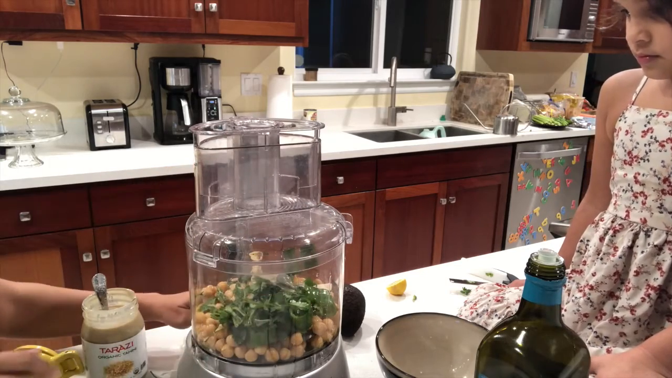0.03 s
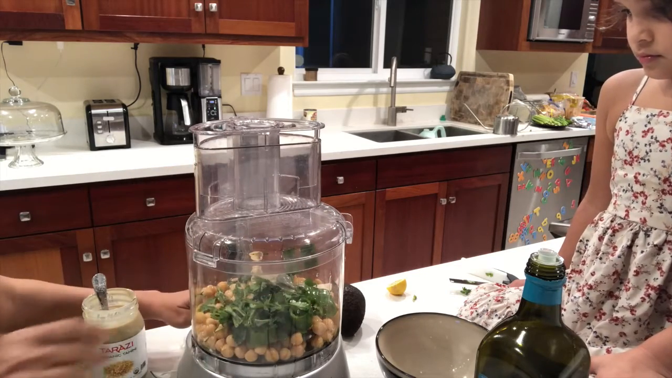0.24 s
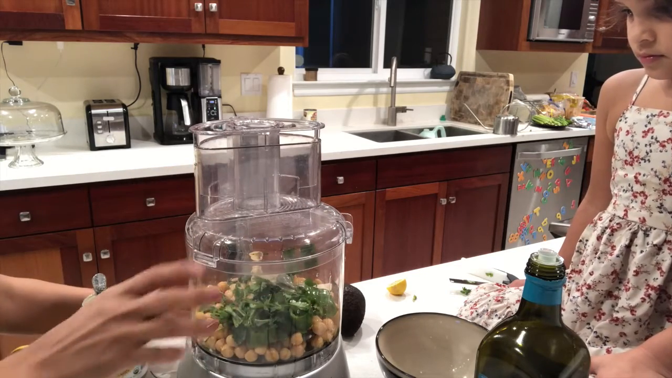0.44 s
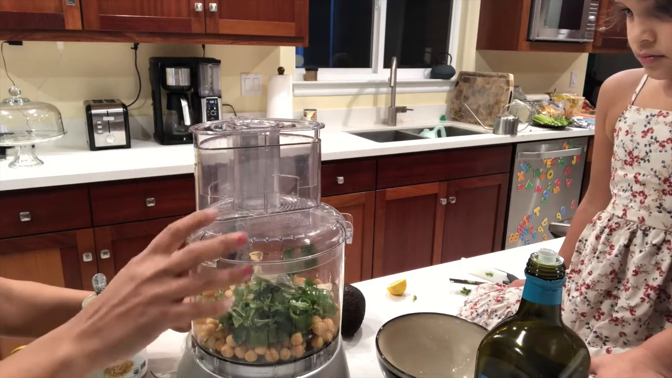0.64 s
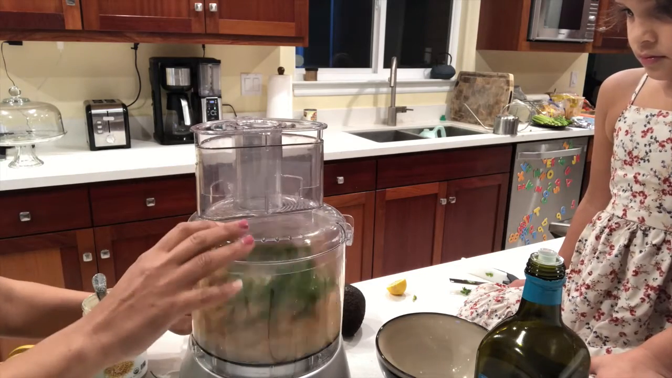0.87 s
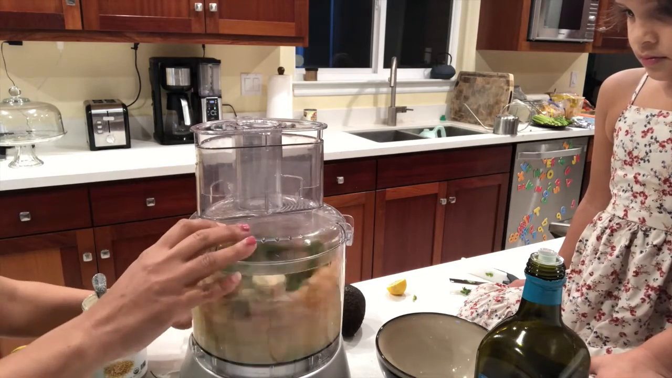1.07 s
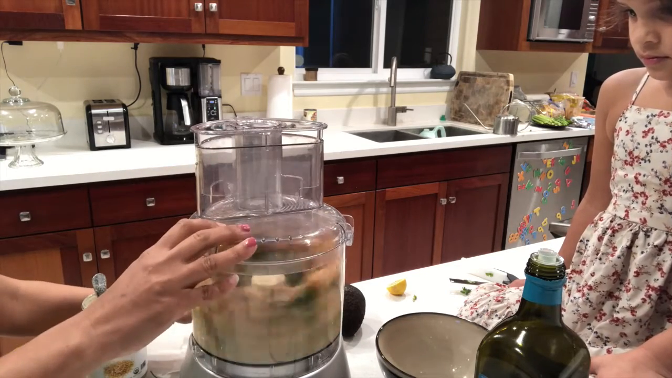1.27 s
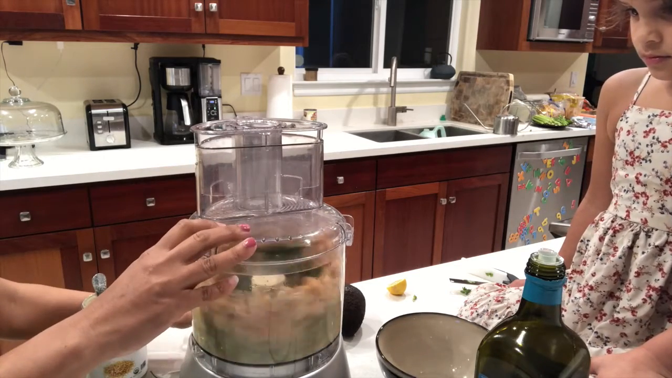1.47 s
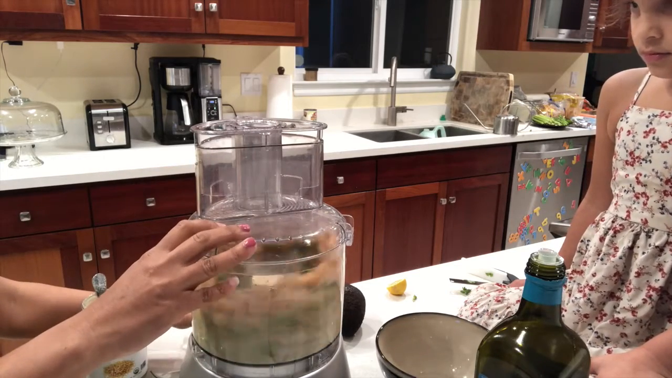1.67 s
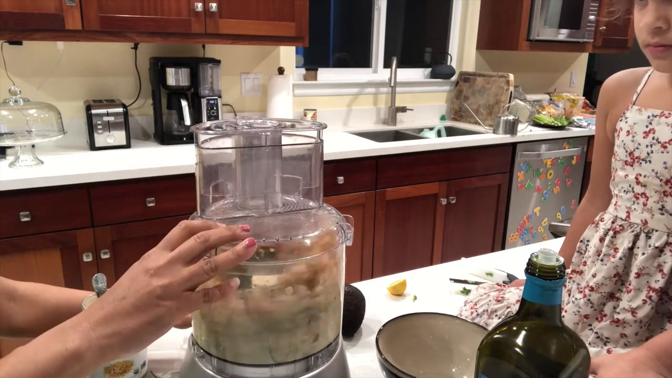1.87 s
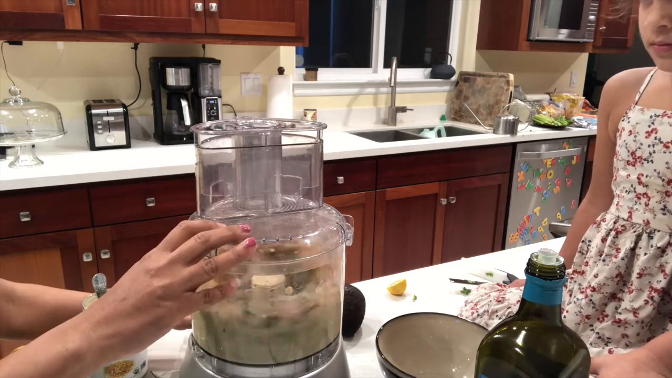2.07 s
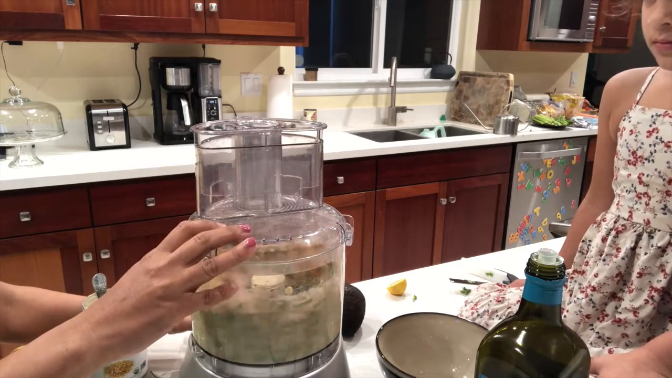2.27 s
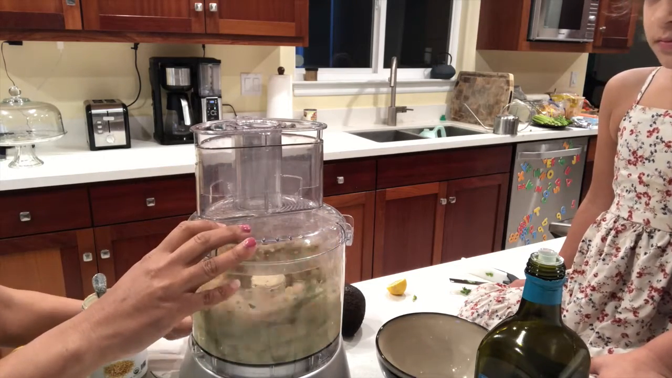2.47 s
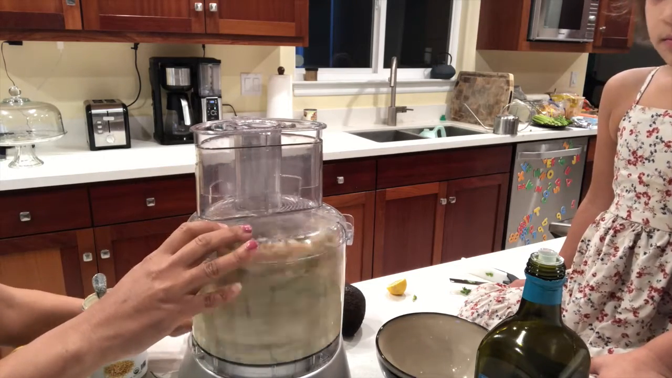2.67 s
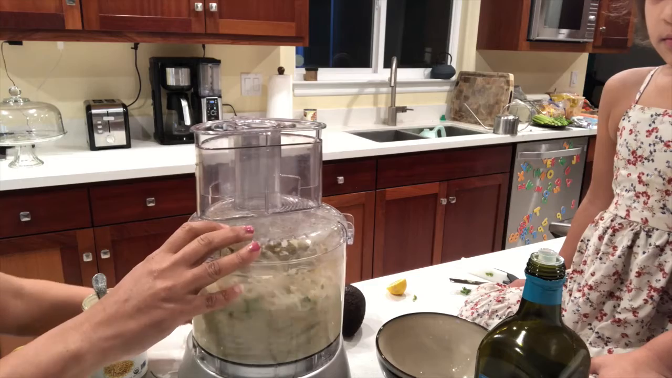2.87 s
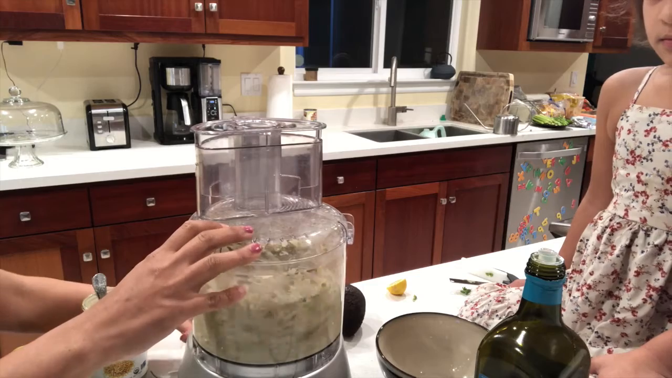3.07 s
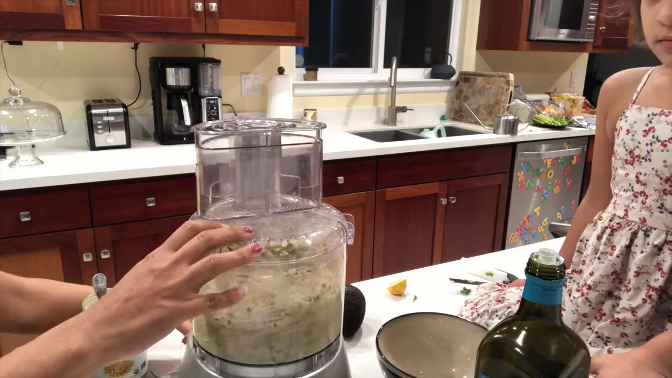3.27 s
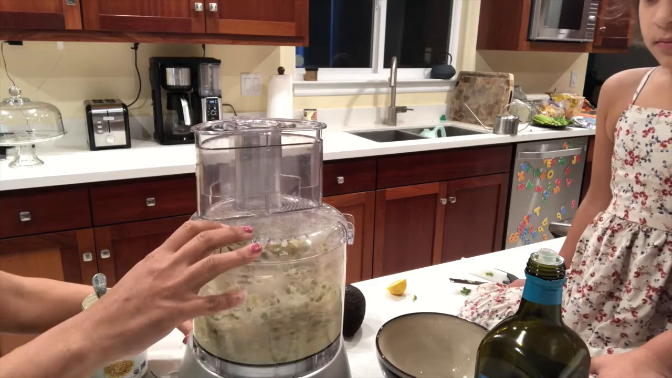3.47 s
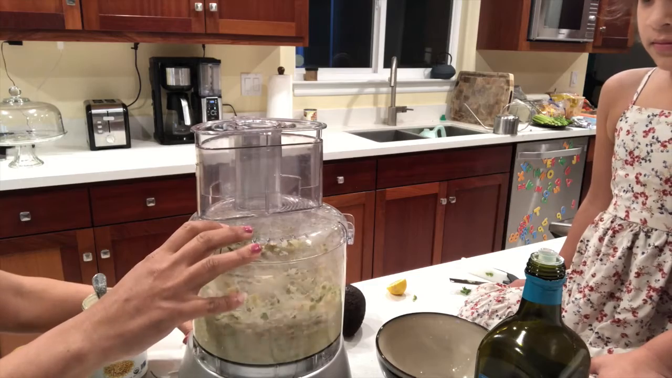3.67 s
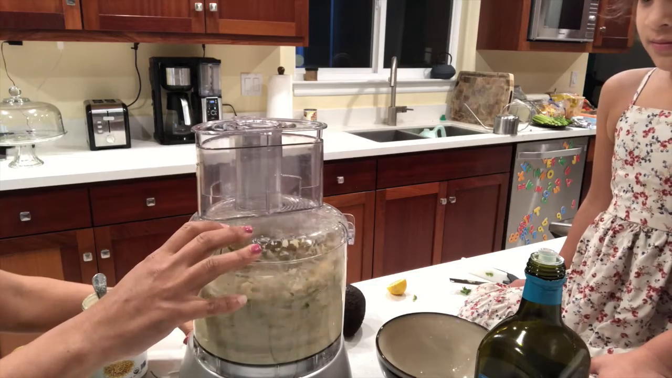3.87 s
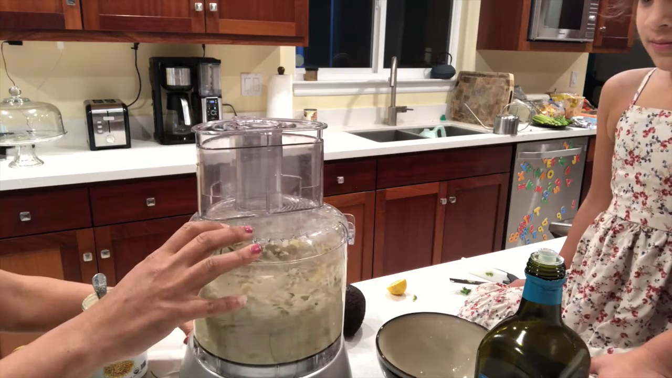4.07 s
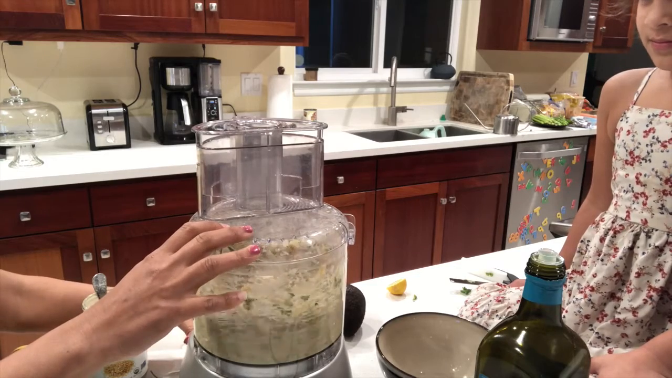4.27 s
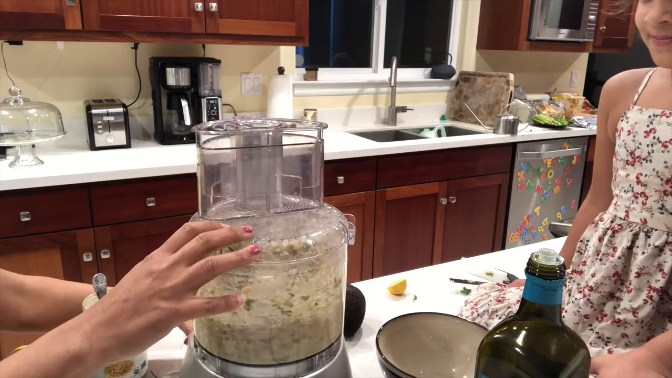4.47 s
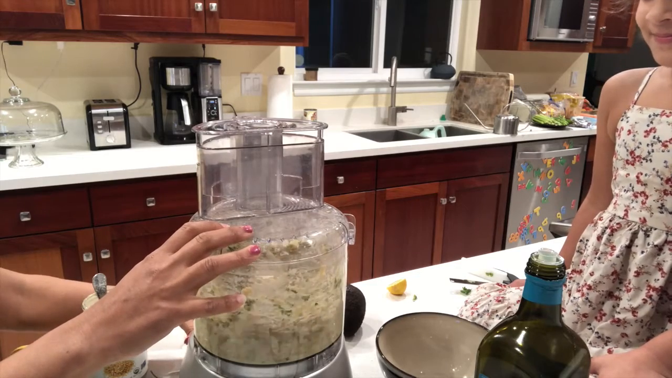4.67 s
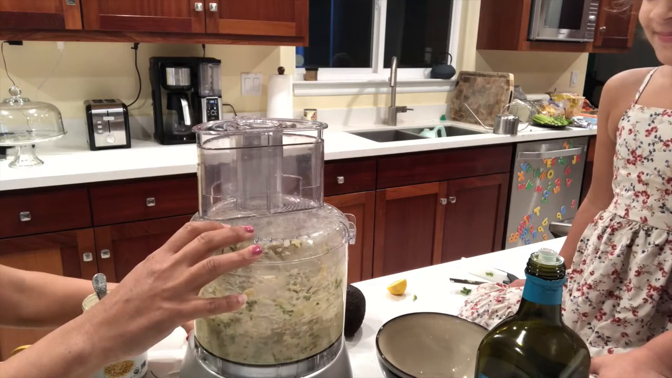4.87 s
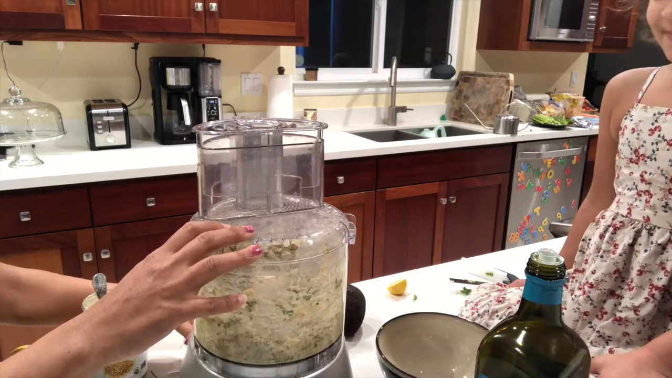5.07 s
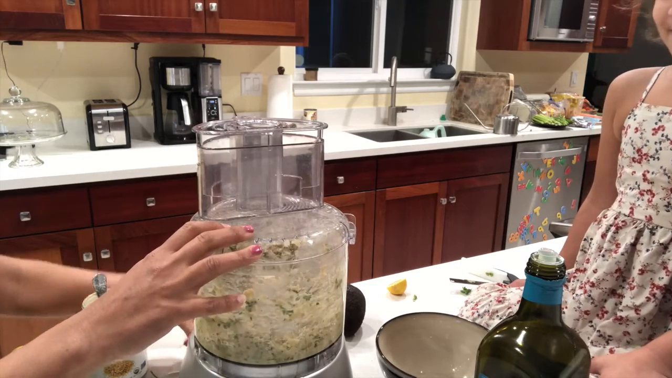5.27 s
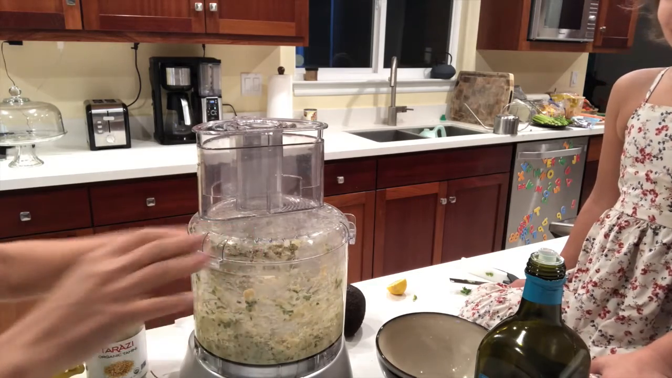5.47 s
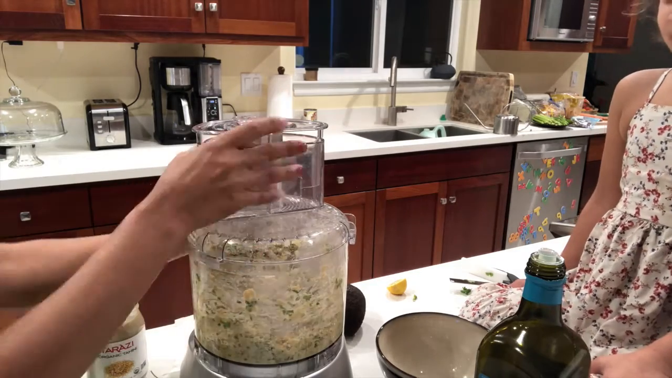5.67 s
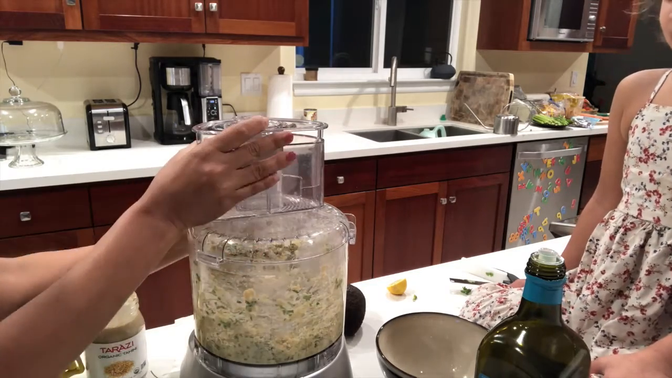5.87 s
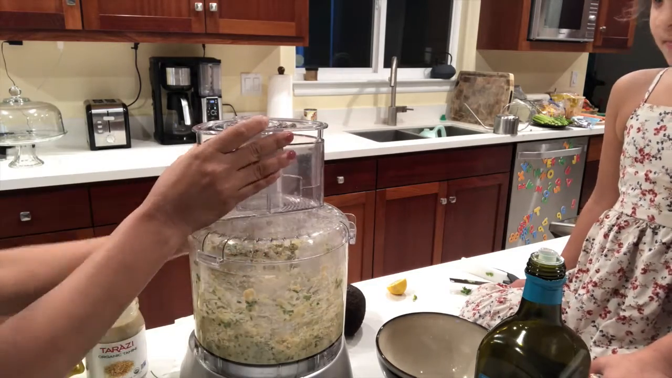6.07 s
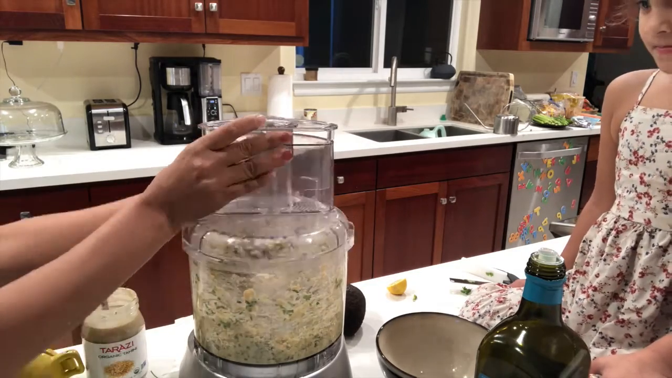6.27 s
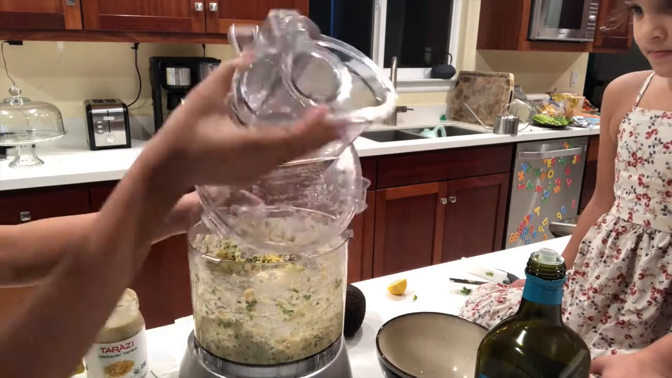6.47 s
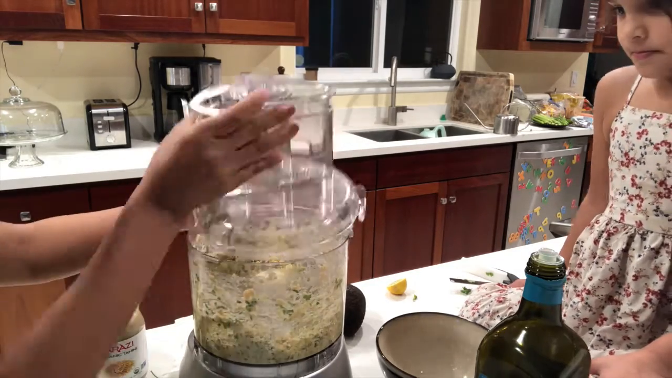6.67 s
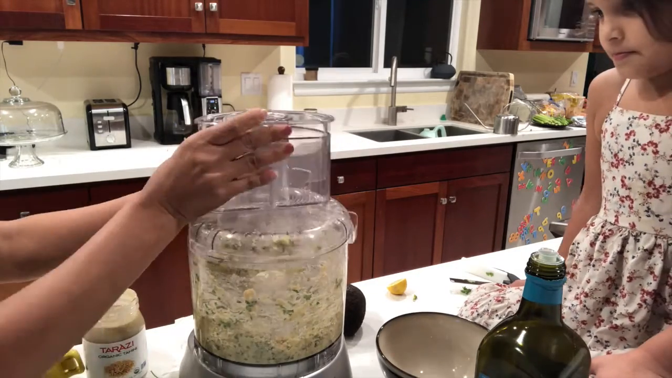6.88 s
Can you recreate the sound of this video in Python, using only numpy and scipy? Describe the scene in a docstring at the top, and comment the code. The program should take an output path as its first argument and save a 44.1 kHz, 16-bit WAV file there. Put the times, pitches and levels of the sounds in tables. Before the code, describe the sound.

For the first 0.7 seconds there is only low, faint kitchen hum with barely audible ticks. A dull thump and click at 0.73-0.8 start a food processor, close and loud. Its motor whirs low with wavering tones over a rumbling base while the plastic bowl rattles. From 1.0 to 1.8 hard chickpeas knock and crack against the wall, strongest near 1.4, 1.55 and 1.8. The mix then churns more evenly, with rough grinding surges and jolts around 2.55-3.0 and 3.7-4.0, and fewer knocks. At 4.9 the power cuts; the noise collapses quickly, leaving faint treble flickers and small ticks near 5.4. The hum ends around 5.6. From 5.75 hands rub and tap the hollow plastic lid in light clicks, with a sharp knock at 6.29 and a cluster of bumps at 6.77-6.85, faintly echoing in the room.

```python
"""Food processor and its lid

A motor spins a two-armed blade through chickpeas and herbs: wavering tones, a rumbling base, a rattling bowl.
Pieces drag on the plastic bowl as swells of rough noise, or knock on it as short rings with dry cracks.
The motor coasts down; hands then click, rub and bump the lid, made of small blows and soft noise.
The blows echo faintly in the kitchen. A low room hum lies underneath and stops before the end."""
import sys
import numpy as np
from scipy import signal
from scipy.fft import rfft, irfft, next_fast_len
from scipy.io import wavfile
from scipy.ndimage import map_coordinates

SR = 44100
rng = np.random.default_rng(int(sys.argv[2]) if len(sys.argv) > 2 else 0)


def log_audio(samples):
    """Write samples as a 16-bit WAV file to the path given in sys.argv[1]."""
    # one column per channel
    frames = np.atleast_2d(samples).T
    # limit to full scale, then quantise
    limited = np.clip(frames, -1, 1)
    pcm = np.round(limited * 32767).astype(np.int16)
    wavfile.write(sys.argv[1], SR, pcm)


def volts_from_db(level):
    """Convert decibel levels to linear amplitude ratios."""
    exponent = np.asarray(level, float) / 20
    return 10 ** exponent


N = 305172
T = np.arange(N) / SR
ON_S, OFF_S = 0.804, 4.908  # the switch


def unit(x):
    """Scales a sound to rms 1."""
    return x / np.sqrt(np.mean(x ** 2) + 1e-20)


def along(points, hz):
    """Reads a curve of (Hz, value) points on a log frequency axis."""
    f, v = np.transpose(points)
    return np.interp(np.log(hz + 1), np.log(f + 1), v)


def gains(rows):
    """One gain per sample for each dB column; -140 dB outside the rows."""
    s, *columns = np.transpose(rows)
    return [volts_from_db(np.interp(T, s, c, left=-140, right=-140)) for c in columns]


def wobble(rate):
    """A smooth random curve with this many knots a second."""
    knots = rng.standard_normal(int(N * rate / SR) + 4)
    return map_coordinates(knots, [T * rate])


def swell(s, half_s):
    """A soft bump in time, down to 1/e at half_s from its middle."""
    return np.exp(-((T - s) / half_s) ** 2)


def white():
    """Fresh white noise."""
    return rng.standard_normal(N)


def filtered(x, response):
    """Multiplies the spectrum of x by a response of frequency."""
    m = next_fast_len(len(x) + 8192)  # room for the ringing
    return irfft(rfft(x, m) * response(np.fft.rfftfreq(m, 1 / SR)), m)[:len(x)]


def noise(spectrum, gate=1):
    """Gated noise of a given colour, rms 1."""
    return unit(filtered(gate * white(), lambda hz: volts_from_db(along(spectrum, hz))))


def modes(table):
    """Response of (Hz, width Hz, dB) resonances with alternating signs."""
    def response(f):
        total = 0
        for k, (centre, width, db) in enumerate(table):
            resonance = 1j * f * width / (centre * centre - f * f + 1j * f * width)
            total = total + (-1) ** k * volts_from_db(db) * resonance
        return total
    return response


def swishes(rows):
    """Each row is a soft swell of noise in its own frequency band."""
    total = 0
    for s, length, hz, width, db in rows:
        band = filtered(white(), lambda f: modes([(hz, width, 0)])(f) ** 2)
        total = total + volts_from_db(db) * swell(s, length / 2) * unit(band)
    return total


# speed of the motor shaft: (time [s], speed [turns/s])
SHAFT_SPEED = [(.79, 24), (.9, 30.2), (1.1, 29.8), (4.88, 29.1), (5.05, 20), (5.3, 6)]


def shaft_angle():
    """Adds up the shaft's speed to the angle it has turned, in radians."""
    return 2 * np.pi * np.cumsum(np.interp(T, *np.transpose(SHAFT_SPEED))) / SR


def blade_gate(depth_db, lumps_db, lump_rate):
    """Each of two blade arms pushes the food once a turn; the load is lumpy."""
    turn = shaft_angle()
    beat = np.cos(2 * turn + .5 * wobble(4.7)) + .4 * np.cos(turn)
    push = 0.5 + 0.17 * wobble(13)
    return volts_from_db(depth_db * beat * push + lumps_db * wobble(lump_rate))


def powered(late_s, rise_s, drop_db, fade_db_per_s):
    """Gain of a layer that wakes after the switch, drops at the stop and dies away."""
    rise = np.clip((T - ON_S - late_s) / rise_s, 0, 1) ** 2
    after = np.maximum(T - OFF_S, 0)
    return rise * volts_from_db(-drop_db * (1 - np.exp(-after / 0.0143)) - fade_db_per_s * after)


# layers of the running machine, before the switch shapes them:
# (time [s], base rumble [dB], bowl rattle [dB], slosh [dB], stem chatter [dB], hum [dB])
RUNNING_LEVELS = [(.8, -32, -26, -42.5, -26, -28), (1.1, -30.5, -29.5, -43, -40.5, -33),
                  (1.35, -31.5, -30.5, -44.5, -35, -42.5), (1.5, -34, -34, -46, -36.5, -40.5),
                  (1.848, -36, -32.5, -48, -42.5, -40), (2.15, -33.5, -29.5, -45, -40, -37.5),
                  (2.5, -30.5, -29.5, -44.5, -38.5, -35), (2.68, -31, -29, -42, -45, -38.5),
                  (2.75, -30.5, -27.5, -40, -39, -47), (2.88, -28.5, -28.5, -44.5, -34, -47),
                  (3.1, -33, -32.5, -45, -39, -37.5), (3.6, -32.5, -31, -42, -36.5, -34),
                  (3.85, -31, -34, -42.5, -38, -37.5), (4.05, -33, -32, -45.5, -36.5, -38),
                  (4.4, -35, -33, -44.5, -38.5, -34.5), (4.85, -34, -31.5, -44, -37, -37),
                  (4.89, -34, -36, -53, -41.5, -37)]


def running():
    """One gain per sample for each layer of the running machine."""
    s, *columns = np.transpose(RUNNING_LEVELS)
    return [volts_from_db(np.interp(T, s, c)) for c in columns]


# motor tones: (multiple of the shaft speed [-], relative level [dB])
SHAFT_ORDERS = [(2, -27), (4, -16), (5, 2), (6, -2), (8, -12.5), (9, -38.5), (10, -20), (11, -6), (14, -15)]


def motor_hum():
    """Tones at multiples of the shaft's speed waver in pitch and level."""
    turn = shaft_angle()
    tones = 0
    for k, db in SHAFT_ORDERS:
        wave = np.sin(k * turn + 0.044 * k * wobble(6.7))
        tones = tones + volts_from_db(db + 0.92 * wobble(2.8)) * wave
    return running()[4] * powered(late_s=0.14, rise_s=0.19, drop_db=13, fade_db_per_s=200) * tones


# colour of the rumbling base: (frequency [Hz], relative level [dB])
BASE_COLOUR = [(53, -49.5), (90, -26.5), (133, -10), (150, -3.5), (200, 3), (259, -0.5), (304, 0),
               (383, -5), (430, -8.5), (542, -14), (650, -14), (840, -49), (1430, -120)]


def base_rumble():
    """The motor's base rumbles: low noise that swells and sinks unevenly."""
    level = running()[0] * powered(late_s=.002, rise_s=.03, drop_db=1.0, fade_db_per_s=112)
    level = level * (1 - .7 * swell(1.0, .015))  # the rumble dips briefly
    gate = blade_gate(depth_db=0.0, lumps_db=-0.05, lump_rate=27) * volts_from_db(.7 * wobble(7.5))
    return level * noise(BASE_COLOUR, gate)


# lumps that jolt the machine: (time [s], rumble level [dB], counter shake level [dB])
JOLT_EVENTS = [(0.822, -30.5, -66), (.87, -19.5, -59), (.915, -26.5, -65), (1.36, -42.5, -54),
               (1.621, -23.5, -59.5), (1.69, -28, -55), (2.15, -26.5, -65.5), (2.645, -24, -35),
               (2.801, -27.5, -54), (2.889, -28, -44.5), (3.01, -28, -52), (3.745, -22, -54),
               (3.81, -37, -66), (3.98, -25.5, -65), (4.74, -45, -54)]


def jolts():
    """Lumps in the food jolt the machine and its base booms in one low resonance."""
    boom = unit(filtered(white(), lambda f: modes([(213, 110, 0)])(f) ** 2))
    return sum(volts_from_db(db) * swell(s, half_s=.018) for s, db, _ in JOLT_EVENTS) * boom


# colour of the shaking counter: (frequency [Hz], relative level [dB])
SHAKE_COLOUR = [(20, -37.5), (40, -16), (60, 12), (80, 3.5), (110, -46)]


def counter_shake():
    """The machine shakes the counter: very low noise, stronger at each jolt."""
    level = volts_from_db(-60 + 3 * wobble(6.3)) * powered(late_s=.01, rise_s=.06, drop_db=3, fade_db_per_s=90)
    level = level + sum(volts_from_db(db) * swell(s, half_s=.04) for s, _, db in JOLT_EVENTS)
    return level * noise(SHAKE_COLOUR, volts_from_db(1.8 * wobble(13)))


# resonances of the blade stem: (frequency [Hz], width [Hz], relative level [dB])
STEM_MODES = [(2080, 160, 2), (2202, 180, 0)]


def stem_chatter():
    """The stem chatters in short bursts, mostly as a blade arm passes."""
    bursts = blade_gate(depth_db=9.0, lumps_db=4.5, lump_rate=62) * volts_from_db(.8 * wobble(10.0))
    sharpened = lambda f: modes(STEM_MODES)(f) * modes([(2120, 900, 0)])(f)
    level = running()[3] * powered(late_s=.03, rise_s=.22, drop_db=4.5, fade_db_per_s=90)
    return level * unit(filtered(bursts * white(), sharpened))


# resonances of the plastic bowl and lid: (frequency [Hz], width [Hz], relative level [dB])
BOWL_MODES = [(788, 44, -6.5), (1070, 54, 4.5), (1247, 47, 2), (1750, 600, -12.5), (2806, 50, -4),
              (3670, 110, -27), (4760, 240, -15.5), (5500, 430, -19), (6310, 200, -19.5), (7300, 190, -20)]


def pelted_bowl():
    """Bits of food pelt the bowl as gated noise and ring its resonances; rms 1."""
    pelting = white() * volts_from_db(1.2 * wobble(300))
    rung = 0
    for mode in BOWL_MODES:  # each wall patch is struck at its own moments
        gate = blade_gate(depth_db=6.0, lumps_db=3.5, lump_rate=49)
        rung = rung + filtered(pelting * gate, modes([mode]))
        pelting = np.roll(pelting, 4410)  # 0.1 s later
    return unit(rung)


# pieces caught and dragged along the wall:
# (time [s], attack [s], hold [s], level [dB], spray level [dB])
DRAGGED_PIECES = [(.793, 0.0041, .03, -42.5, -58), (0.803, 0.056, 0.046, -24, -51),
                  (1.578, 0.033, 0.0045, -26.5, -59.5), (2.563, .008, 0.13, -23, -39),
                  (2.762, 0.047, 0.017, -22.5, -38.5), (3.007, 0.0055, 0.0047, -28, -55.5),
                  (3.038, .015, .005, -35, -55), (3.721, 0.0066, 0.1625, -23.5, -33),
                  (3.899, 0.013, .003, -25, -34.5), (3.928, 0.023, 0.031, -25.5, -36)]


def grip():
    """For each dragged piece: bite, a sagging hold, then letting go."""
    curves = []
    for s, attack, hold, *_ in DRAGGED_PIECES:
        bite = np.clip((T - s) / attack, 0, 1) ** 2
        sag_db = 17 * np.maximum(T - s - attack, 0)  # 17 dB per second
        # a slower bite lets go more slowly
        let_go_db = 20 * np.maximum(T - s - attack - hold, 0) / (.04 + attack)
        curves.append(bite * volts_from_db(-sag_db - let_go_db))
    return curves


# colour of the sloshing paste: (frequency [Hz], relative level [dB])
SLOSH_COLOUR = [(240, -22), (400, 1.5), (538, -11), (769, 3), (1550, -12.5), (2150, -9.5), (2430, -12.5),
                (2800, -13.5), (8720, -39), (15000, -37.5), (16500, -51)]


def churn():
    """The pelted bowl rattles while the paste sloshes under a buzz at twice the mains frequency."""
    rattle, slosh = running()[1:3]
    rattle = rattle * powered(late_s=.12, rise_s=0.1, drop_db=6.5, fade_db_per_s=67)
    slosh = slosh * powered(late_s=0.086, rise_s=.13, drop_db=0.5, fade_db_per_s=74)
    spray = sum(volts_from_db(row[4]) * g for row, g in zip(DRAGGED_PIECES, grip()))
    slosh = np.hypot(slosh, spray)
    mains_hz = 60
    buzz = volts_from_db(0.69 * np.cos(4 * np.pi * mains_hz * T))
    wash = noise(SLOSH_COLOUR, buzz * blade_gate(depth_db=1.0, lumps_db=1.5, lump_rate=35))
    high = filtered(wash, lambda hz: 1 / (1 + (3500 / (hz + 1)) ** 4))
    low = wash - high  # the low part follows the rattle, the high part the slosh
    return rattle * (volts_from_db(-4.5) * pelted_bowl() + volts_from_db(-3.5) * low) + slosh * volts_from_db(2.0) * unit(high)


# colour of a piece grinding on the wall: (frequency [Hz], relative level [dB])
GRIND_COLOUR = [(180, -29), (300, -1), (464, -26.5), (587, -5), (1150, 0), (1270, 2), (1430, -3),
                (2130, -4.5), (2400, -12), (3710, -14), (7380, -22.5), (15200, -37.5), (16500, -49)]


def dragging():
    """A caught piece slips along the wall in dense uneven jerks."""
    jerks = volts_from_db(1.0 * wobble(90) + 2.8 * wobble(400))
    jerks = jerks * blade_gate(depth_db=1.0, lumps_db=1.3, lump_rate=23)
    level = sum(volts_from_db(row[3]) * g for row, g in zip(DRAGGED_PIECES, grip()))
    return level * noise(GRIND_COLOUR, jerks)


def blows(events, body, ring_s, crack_s, body_db, thud_db, thud_hz, rise_s):
    """Each blow rings at its own pitch, thuds, cracks drily, and wakes the modes of the body."""
    out = np.zeros((3, N + SR))  # tones, cracks, treble
    t = np.arange(SR // 8) / SR
    for s, db, hz, crack_db, treble_db in events:
        ring = np.sin(2 * np.pi * hz * t) * volts_from_db(-60 * t / ring_s)
        rest = 0
        for f, mode_db, t60 in body:  # each blow wakes the modes a little differently
            decay = volts_from_db(body_db + mode_db + 3 * rng.standard_normal() - 60 * t / t60)
            rest = rest + decay * np.sin(2 * np.pi * f * t)
        thud = volts_from_db(thud_db - 60 * t / 0.051) * np.sin(2 * np.pi * thud_hz * t) * (1 - np.exp(-t / 0.0066))
        fade = volts_from_db(-60 * t / crack_s) + volts_from_db(-14.5 - 60 * t / (6.4 * crack_s))  # the wall buzzes on weakly
        cracks = volts_from_db(7.5 + np.array([[crack_db], [treble_db]])) * fade * rng.standard_normal((2, len(t)))
        blow = np.vstack([ring + rest + thud, cracks]) * (1 - np.exp(-t / rise_s))
        out[:, round(s * SR):][:, :len(t)] += volts_from_db(db - 8.0) * blow
    mids = filtered(out[1], lambda f: 2.0 * modes([(1700, 1500, 0), (3400, 2500, -4)])(f))
    highs = filtered(out[2], lambda f: 0.91 * modes([(7500, 9000, 0)])(f) ** 2)
    return filtered(out[0] + mids + highs, lambda f: (1j * f / (120 + 1j * f)) ** 3)[:N]  # less bass


def scattered(count, span_s, top_db, pitches_hz, least_crack_db, least_treble_db):
    """Rows of small blows at random moments, up to 9 dB weaker and up to 8 dB more crackly."""
    first, last = span_s
    rows = []
    for a, b, c, d, e in rng.random((count, 5)):
        pitch = pitches_hz[int(c * len(pitches_hz))]
        rows.append((first + a * (last - first), top_db - 9 * b, pitch,
                     least_crack_db + 8 * d, least_treble_db + 8 * e))
    return rows


def bowl_walls():
    """The bowl's resonances as (Hz, dB, decay s); narrow ones ring longer."""
    return [(hz, db, 2.7 / width) for hz, width, db in BOWL_MODES]


# hard pieces thrown at the wall:
# (time [s], level [dB], pitch [Hz], relative crack [dB], relative treble [dB])
WALL_KNOCKS = [(1.006, -16.5, 860, -11, -22), (1.05, -16.5, 2140, -6.5, -17), (1.099, -14, 2180, -16, -21),
               (1.253, -14, 1240, -7.5, -22), (1.294, -9.5, 1070, -16, -25),
               (1.336, -14.5, 2810, -3.5, -27), (1.372, -7, 1417, 0, -13), (1.415, -15, 1070, -7.5, -21),
               (1.491, -14, 1260, -11.5, -27), (1.552, -4, 2100, -4.5, -14.5),
               (1.593, -11.5, 1240, -12, -28.5), (1.671, -13, 1050, -16, -36), (1.716, -10, 1000, -25, -36),
               (1.817, -3.5, 1330, -11, -20), (2.153, -14, 1061, -18, -24), (2.568, -4, 1070, -14, -40),
               (2.64, -13, 1216, -12.5, -12), (2.687, -11.5, 1200, -12, -14), (2.964, -13, 2020, -11, -34),
               (3.013, -7, 1300, -13, -20), (3.054, -14, 1070, -6.5, -26), (3.73, -16, 1260, -8.5, -21),
               (3.911, -12.5, 1210, -7, -11), (3.952, -17, 2090, 1.5, -17), (3.98, -10.5, 2080, -9.5, -18),
               (4.163, -17, 1070, -24, -34), (4.743, -19, 753.4, -9, -26), (4.87, -37, 2110, -8, -14),
               (4.905, -20, 2088, -1, -22), (4.927, -32, 2120, 2, -20), (4.954, -25, 2100, -7, -36)]


def bowl_knocks():
    """Hard pieces hit the bowl, with smaller pieces at random moments on any patch of wall."""
    bits = scattered(count=22, span_s=(1.1, OFF_S), top_db=-21, pitches_hz=(850, 1050, 1240, 2090),
                     least_crack_db=-14.5, least_treble_db=-31.5)
    return blows(WALL_KNOCKS + bits, bowl_walls(), ring_s=0.029, crack_s=.022, body_db=-13.0,
                 thud_db=-13, thud_hz=191.0, rise_s=0.0007)


# switch and small ticks: (time [s], level [dB], pitch [Hz], relative crack [dB], relative treble [dB])
SWITCH_TICKS = [(0.195, -67, 330, -6, 13), (.364, -62, 310, 3, -2), (.734, -34.5, 175, -52, -47),
                (.765, -52, 2200, 6, -17.5), (.794, -50.5, 1900, 2, 17), (0.801, -25, 2050, -6, -28),
                (5.362, -38.5, 1800, -10.5, -24), (5.39, -46, 1500, -6, -27.5)]


def switch_ticks():
    """The switch and small ticks: blows with a strong thud that wake the bowl only weakly."""
    return blows(SWITCH_TICKS, bowl_walls(), ring_s=0.029, crack_s=.022, body_db=-22.5,
                 thud_db=12.5, thud_hz=180, rise_s=0.00056)


# lid and hands on the plastic:
# (time [s], level [dB], pitch [Hz], relative crack [dB], relative treble [dB])
LID_CLICKS = [(5.822, -37, 724, -14, -24), (5.973, -51, 848, -7, -5), (5.988, -46, 674, -1, -10),
              (6.005, -50, 790, -10, -17), (6.024, -49, 850, -4, -14), (6.03, -46, 744, -24, -15),
              (6.113, -44.5, 1110, -3, -7), (6.128, -51, 1180, -11, -23), (6.151, -39.5, 711, -11, -23),
              (6.193, -46, 727, -16, -23), (6.226, -48, 762, -8, -11), (6.255, -54, 896, 2, -3),
              (6.288, -19.5, 795, -11, -10.5), (6.278, -58, 900, -6, -14), (6.39, -52, 824, -9, -14),
              (6.356, -36.5, 1080, -14, -19), (6.42, -42.5, 1000, -11, -13), (6.428, -44, 872, -2, -24),
              (6.46, -51, 1120, -15, -12), (6.478, -41, 1000, -8, -9), (6.579, -54, 1014, -5.5, -4),
              (6.612, -45.5, 1110, -5, -7), (6.628, -48, 1080, -19, -23), (6.77, -41, 1090, -1.5, -17),
              (6.796, -55, 985, -1, -10), (6.815, -39, 1440, 1.5, -19), (6.824, -38, 1440, 1, -6),
              (6.847, -31.5, 1170, -8, -11)]
# resonances of the hollow lid: (frequency [Hz], relative level [dB], time to fall 60 dB [s])
LID_MODES = [(717, -7, 0.045), (953, 3, 0.027), (1120, -12, 0.033)]


def lid_clicks():
    """The lid clicks under the hands, with faint random clicks while it is twisted."""
    fidget = scattered(count=12, span_s=(5.78, 7.6), top_db=-56, pitches_hz=[hz for hz, *_ in LID_MODES],
                       least_crack_db=-14, least_treble_db=-16)
    return blows(LID_CLICKS + fidget, LID_MODES, ring_s=0.019, crack_s=0.012, body_db=-9.5,
                 thud_db=-24, thud_hz=267, rise_s=0.001)


# hands rubbing the lid: (time [s], hollow level [dB], rustle level [dB])
HAND_RUB = [(5.66, -85.5, -84), (5.846, -72, -78), (5.972, -74, -83), (6.234, -82.5, -80),
            (6.322, -73, -67), (6.42, -79, -82), (6.546, -81, -84), (6.638, -88, -86), (6.92, -92, -86)]
# colour of skin on plastic: (frequency [Hz], relative level [dB])
SKIN_COLOUR = [(880, -39), (1500, -8.5), (3030, -1.5), (4590, -7.5), (5020, -5), (11000, -20), (16000, -28)]


def hand_sliding():
    """Hands slide in tiny slips: noise rings the hollow lid and rustles above it."""
    hollow, rustle = gains(HAND_RUB)
    slips = volts_from_db(6.5 * wobble(85))
    shell = unit(filtered(slips * white(), modes([(718, 200, 0), (1052, 360, -1.5)])))
    skin = noise(SKIN_COLOUR, volts_from_db(4.0 * wobble(45)))
    return volts_from_db(-4.5) * hollow * shell + volts_from_db(-3.0) * rustle * skin


# short swishes of skin on plastic:
# (time [s], length [s], centre [Hz], width [Hz], level [dB])
SKIN_SWISHES = [(5.745, 0.037, 5220, 3500, -76), (5.79, .015, 7600, 1200, -79),
                (5.82, 0.027, 9300, 1500, -73), (5.86, 0.023, 10300, 2500, -71),
                (5.87, 0.12, 3000, 500, -80), (5.906, .04, 5500, 6000, -74), (6.035, .03, 4510, 2980, -78)]


def hand_swishes():
    """Skin brushes the plastic in short soft swells of noise."""
    return swishes(SKIN_SWISHES)


# the lid's rim on the bowl: (time [s], level [dB])
RIM_BUMPS = [(6.292, -60), (6.618, -69), (6.775, -69), (6.826, -58), (6.851, -57)]


def rim_bumps():
    """The lid's rim bumps the bowl dully: bursts of noise in one low resonance."""
    fade = 0
    for s, db in RIM_BUMPS:
        rise = np.clip((T - s) / 0.0082, 0, 1)
        fade = fade + volts_from_db(db - 60 * np.maximum(T - s, 0) / 0.087) * rise
    return fade * unit(filtered(white(), lambda f: modes([(250, 150, 0)])(f) ** 3))


# faint treble flicker after the stop:
# (time [s], length [s], centre [Hz], width [Hz], level [dB])
FLICKER_ROWS = [(4.99, .012, 13300, 3000, -64), (5.05, 0.092, 12500, 7000, -72),
                (5.297, 0.082, 12500, 9000, -64.5), (5.44, 0.068, 7000, 1800, -67),
                (5.45, .06, 14500, 4000, -76.5)]


def treble_flicker():
    """The treble flickers faintly after the stop, in soft swells of noise."""
    return swishes(FLICKER_ROWS)


# how long the kitchen echoes: (frequency [Hz], time to fall 60 dB [s])
KITCHEN_DECAY = [(200, .35), (2000, 0.23), (10000, 0.26)]


def kitchen(x):
    """The room answers with a noise tail in which each frequency dies at its own speed."""
    hz, t, z = signal.stft(rng.standard_normal(SR // 2), SR, nperseg=256)
    decay = volts_from_db(-60 * t / along(KITCHEN_DECAY, hz)[:, None])
    tail = signal.istft(z * decay, SR, nperseg=256)[1]
    late = np.pad(x, (200, 0))  # the echo starts 200 samples late
    return signal.fftconvolve(late, tail / np.linalg.norm(tail))[:N]


# colour of the kitchen hum: (frequency [Hz], relative level [dB])
AIR_COLOUR = [(15, -48.5), (25, -18.5), (105, -4), (141, -9.5), (170, 1), (200, -10), (326, -9.5),
              (695, -16), (911, -18), (1330, -23.5), (1890, -27), (2350, -27), (3160, -27.5), (7310, -33.5),
              (16000, -48.5)]


def kitchen_hum():
    """Low noise fills the room, slightly softer after the switch-off, and stops short."""
    level = volts_from_db(-61 - 1.3 * (T > OFF_S))
    stop = np.clip((5.624 - T) / 0.014, 0, 1)  # silent from 5.624 s
    return level * stop * noise(AIR_COLOUR, volts_from_db(2.1 * wobble(24)))


# colour of the faint floor that remains: (frequency [Hz], relative level [dB])
STILL_COLOUR = [(59, -63), (100, -30.5), (229, -6.5), (492, -7.5), (621, -9), (691, 2.5), (1420, -11),
                (1870, -11.5), (2270, -16.5), (16000, -33)]
# faint steady tones: (frequency [Hz], level [dB])
STILL_TONES = [(484.5, -93), (689.1, -89)]


def still_floor():
    """Very faint noise and two thin tones that last throughout."""
    floor = volts_from_db(-82) * noise(STILL_COLOUR)
    for hz, db in STILL_TONES:
        floor = floor + volts_from_db(db + 1.5 * wobble(15)) * np.sin(2 * np.pi * hz * T)
    return floor


def scene():
    """Machine and lid in the kitchen, over the room's own hum; only the blows and lid echo."""
    motor = motor_hum() + base_rumble() + jolts() + counter_shake()
    machine = motor + stem_chatter() + churn() + dragging()
    lid = lid_clicks() + hand_sliding() + hand_swishes() + rim_bumps()
    hits = bowl_knocks() + switch_ticks() + lid
    background = treble_flicker() + kitchen_hum() + still_floor()
    return (machine + hits + volts_from_db(-15) * kitchen(hits) + background)[None]


def top_cut(x):
    """Nothing passes above the cut-off."""
    return signal.sosfilt(signal.butter(12, 16990, fs=SR, output="sos"), x)


def record(dry):
    """The microphone cuts deep bass steeply, and the treble falls off sharply around 16 kHz."""
    def microphone(hz):
        bass_cut = (1j * hz / (30 + 1j * hz)) ** 3
        return bass_cut / (1 + (hz / 16000) ** 60)
    mix = filtered(dry[0], microphone)[None]
    return top_cut(mix)


dry = scene()
out = record(dry)
log_audio(out)
```